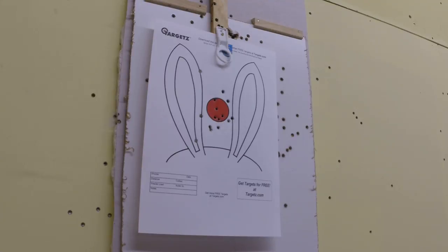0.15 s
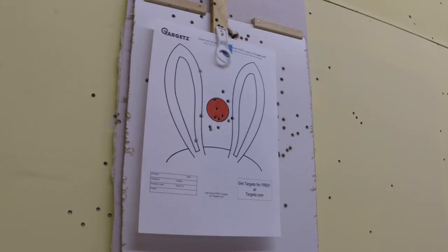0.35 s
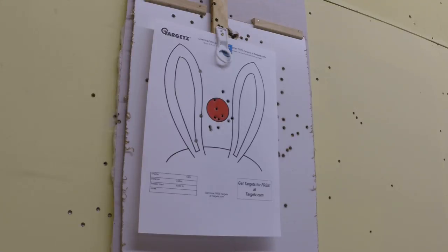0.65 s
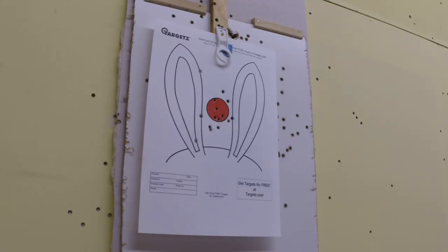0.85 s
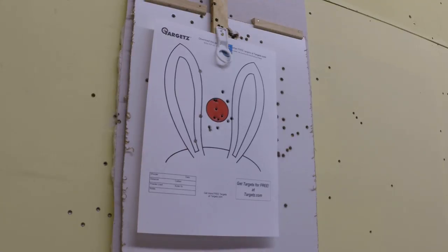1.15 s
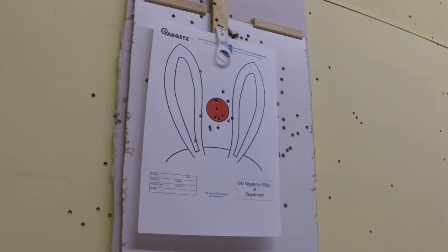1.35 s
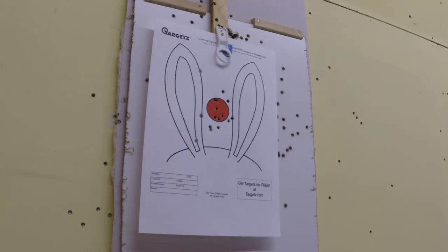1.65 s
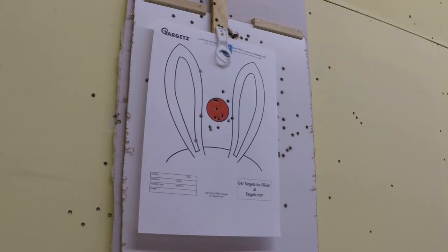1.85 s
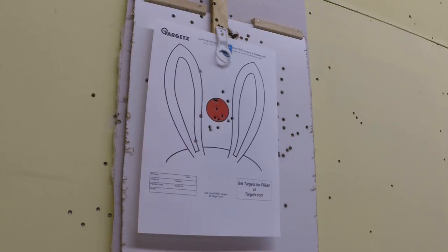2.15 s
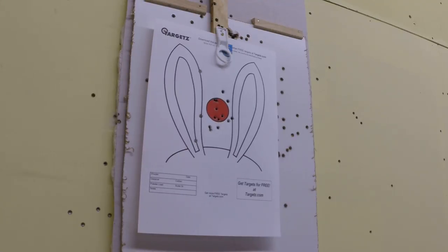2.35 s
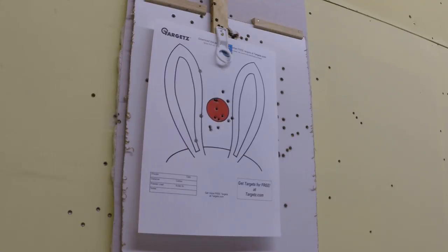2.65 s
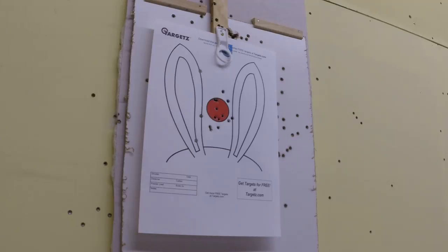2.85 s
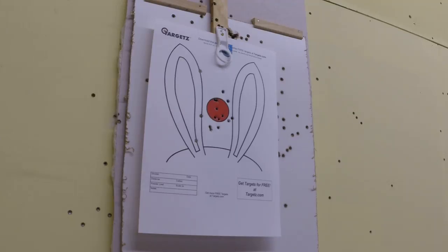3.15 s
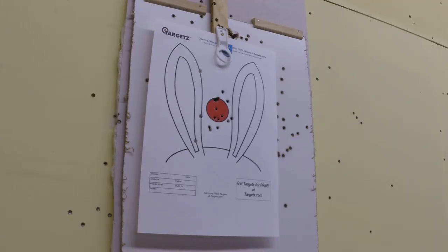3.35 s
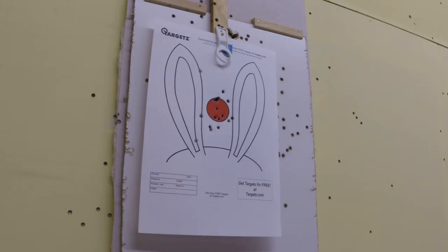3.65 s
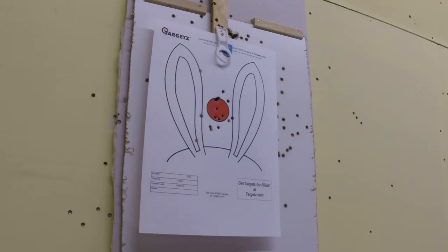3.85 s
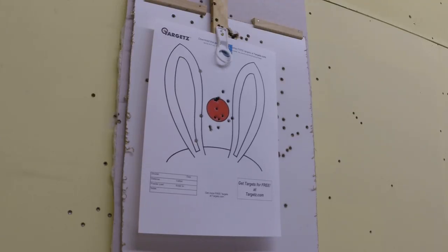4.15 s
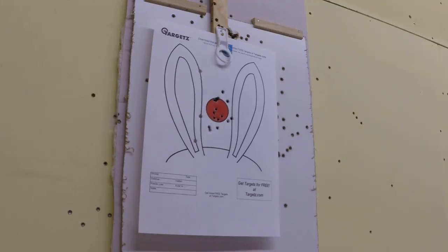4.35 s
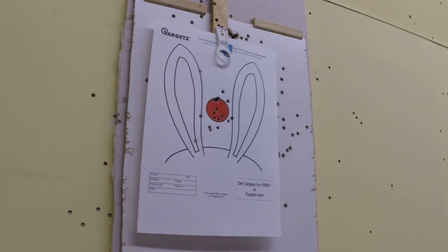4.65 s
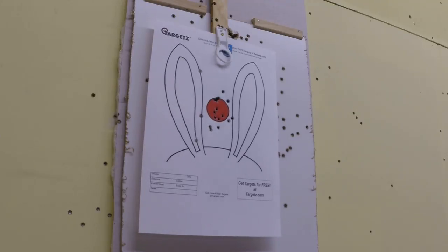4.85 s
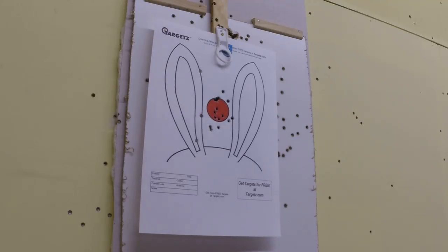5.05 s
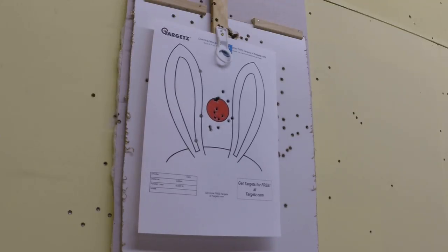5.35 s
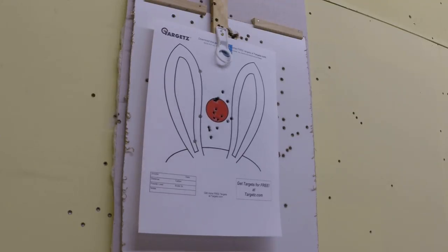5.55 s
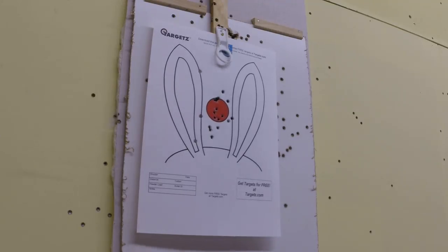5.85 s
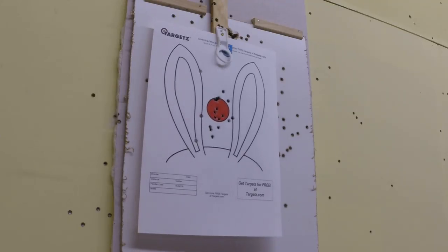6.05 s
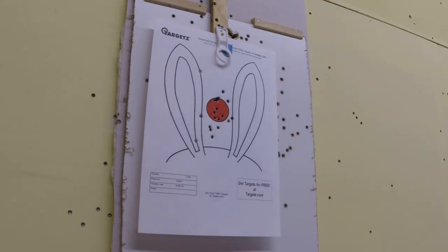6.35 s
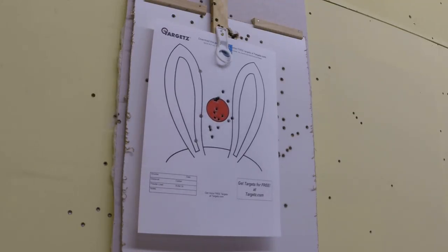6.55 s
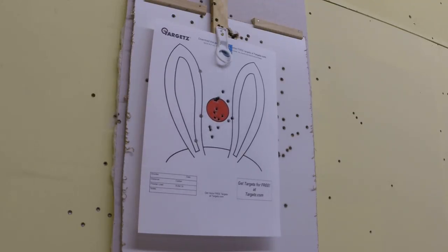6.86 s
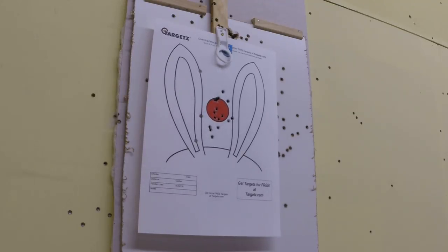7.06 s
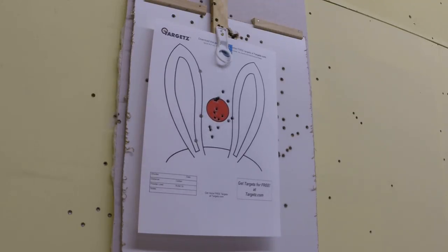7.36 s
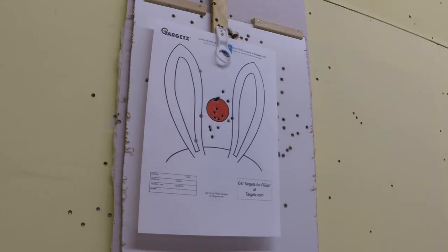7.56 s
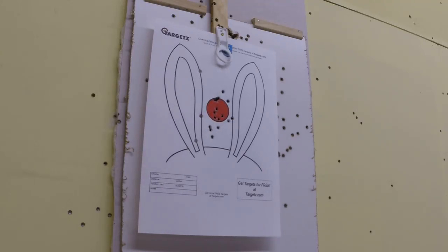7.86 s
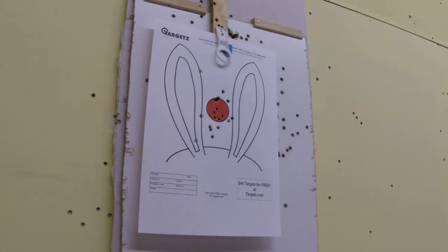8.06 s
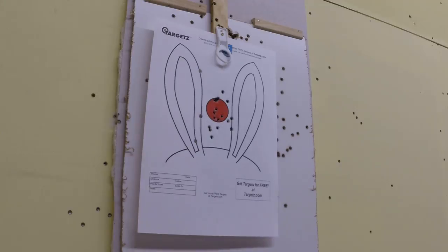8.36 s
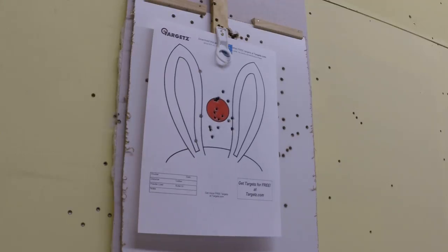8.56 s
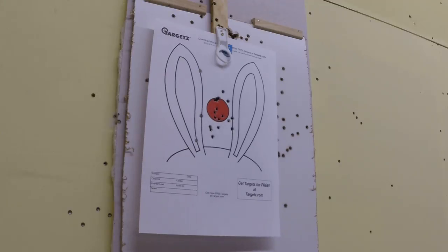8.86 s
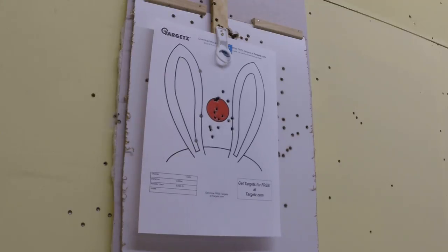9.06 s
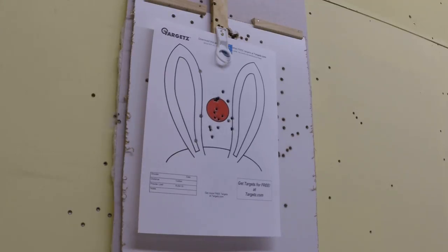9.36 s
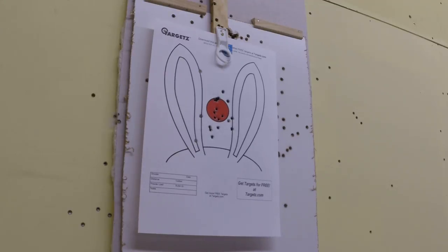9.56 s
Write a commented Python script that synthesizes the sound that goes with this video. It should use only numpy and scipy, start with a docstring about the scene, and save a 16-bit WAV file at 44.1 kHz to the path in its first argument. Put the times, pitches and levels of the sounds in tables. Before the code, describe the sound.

A small pistol fires five single, echoing shots in an indoor shooting hall, with faint gun clicks and humming ventilation between them.

```python
"""An indoor shooting range, beside the paper target: five small-calibre pistol shots over a ventilation hum.
Each blast, a shock wave, outruns its subsonic bullet, which then snaps through the paper. Reflections
from walls and ceiling baffles follow, and the long hall roars with reverberation. Spent cases tinkle and
guns click far away, ringing at their natural frequencies. A gain control ducks the hum after every shot."""
import sys
import numpy as np
from scipy import signal
from scipy.fft import rfft, irfft
from scipy.io import wavfile
from scipy.ndimage import uniform_filter1d

SR = 44100
rng = np.random.default_rng(int(sys.argv[2]) if len(sys.argv) > 2 else 0)


def master(y):
    """Save y as 16-bit WAV."""
    cut = np.clip(np.atleast_2d(y).T, -1, 1)
    pcm = np.round(cut * 32767)  # scale
    wavfile.write(sys.argv[1], SR, pcm.astype(np.int16))


N = 427769


def undb(db):
    return 10 ** (np.asarray(db) / 20)


def level(x, db):
    """Scale to an rms level."""
    return x * undb(db) / np.sqrt(np.mean(x ** 2))


def seconds(size):
    return np.arange(size) / SR


def bins(size):
    return np.arange(size // 2 + 1) * SR / size


def lookup(hz, points):
    """Interpolate (Hz, value) points on a log-frequency axis."""
    point_hz, value = np.transpose(points)
    return np.interp(np.log(np.maximum(hz, 1)), np.log(point_hz), value)


def noise(points, size):
    """Spectral shaping: noise of rms 1 with a (Hz, dB) spectrum."""
    spectrum = rfft(rng.standard_normal(size)) * undb(lookup(bins(size), points))
    return level(irfft(spectrum, size), 0)


def resonance(hz, width_hz, db, size):
    """Forced vibration: one resonance driven by noise, at an rms level."""
    shape = 1 / (1 + ((bins(size) - hz) * 2 / width_hz) ** 2)
    return level(irfft(rfft(rng.standard_normal(size)) * shape, size), db)


def colour(x, points, size=4096):
    """Minimum-phase filtering: a causal (Hz, dB) response keeps attacks sharp."""
    cepstrum = irfft(np.log(undb(lookup(bins(size), points))))
    cepstrum[1:size // 2] *= 2
    cepstrum[size // 2 + 1:] = 0
    impulse_response = irfft(np.exp(rfft(cepstrum)))
    return signal.fftconvolve(x, impulse_response)[:len(x)]


def fade(t, t60):
    """Exponential decay: 60 dB down after t60 seconds."""
    return np.exp(-np.log(1000) * t / t60)


def add(out, start_s, x):
    """Mix x into out from start_s on."""
    i = int(round(start_s * SR))
    out[i:i + len(x)] += x[:max(len(out) - i, 0)]


# Air in the ducts. Each row: frequency in Hz, relative spectral density in dB.
AIR_SPECTRUM = [(12, -41.5), (20, -7.5), (82, -5.5), (124, -2), (194, -16), (270, -19), (302, -25),
                (445, -32.5), (497, -30.5), (540, -30), (818, -35), (1270, -42), (12000, -63.5),
                (13400, -63.5), (15000, -68.5)]
# Fan hum, duct resonances and a thin hiss. Each row: frequency in Hz, width in Hz, level in dB.
HUM_BANDS = [(118, 26, -44), (268, 13, -51), (812, 40, -65), (13200, 500, -84)]

def ventilation(air_db=-33.5, surge_db=1, bass_hz=200):
    """Flow noise and duct resonance: a rumble whose bass surges a little, under a wavering fan hum."""
    surge = noise([(2, 0), (8, -40), (30, -120)], N)
    air = noise(AIR_SPECTRUM, N) * undb(air_db)
    bass = signal.sosfilt(signal.butter(2, bass_hz, fs=SR, output="sos"), air)
    hum = sum(resonance(hz, width_hz, db, N) for hz, width_hz, db in HUM_BANDS)
    return air + bass * (undb(surge_db * surge) - 1) + hum


# The blast as it leaves the firing booth. Each row: frequency in Hz, relative level in dB.
BLAST_SPECTRUM = [(50, -14), (160, -11), (280, 1.5), (400, -9.5), (600, 2.5), (790, -10.5), (1300, -18),
                  (1800, -18.5), (2250, -9.5), (2850, -18.5), (3700, -10), (5000, -17), (10500, -23),
                  (15000, -45.5)]
# Booth resonances that give the crack its edge. Each row: frequency in Hz, width in Hz, boost in dB.
BOOTH_RESONANCES = [(1330, 61, 7.5), (2240, 200, 2.5), (3400, 340, 3.5), (5610, 160, 6.5), (6860, 90, 4.5)]

def blast(t, length_s=0.0061, size=1024):
    """Shock wave: with its first bounces in the booth, a few ms of dense pressure jumps of rms about 1."""
    gate = seconds(size) < length_s
    jumps = rng.standard_normal(size) * gate
    for _ in range(20):  # a shock holds all frequencies evenly
        phase = np.angle(rfft(jumps))
        jumps = irfft(np.exp(1j * phase)) * gate
    wave = colour(np.pad(jumps, (0, len(t) - size)), BLAST_SPECTRUM)
    for hz, width_hz, db in BOOTH_RESONANCES:
        ringing = signal.lfilter(*signal.iirpeak(hz, hz / width_hz, fs=SR), wave)
        wave = wave + (undb(db) - 1) * ringing
    return wave * np.sqrt(length_s * SR / np.sum(wave ** 2))


# Distinct wall echoes of the blast. Each row: delay in seconds, gain in dB.
WALL_ECHOES = [(0.019, -11), (0.0243, -8.5), (.036, -14.5)]

def near_walls(t, wave, scatter_db=-10, scatter_t60=0.23, slap_band_hz=(750, 4400)):
    """Early reflection: frames and walls scatter the blast; small panels return thin, dull slaps."""
    scatter = rng.standard_normal(len(t)) * fade(t, scatter_t60)
    scatter *= undb(scatter_db) / np.sqrt(np.sum(scatter ** 2))
    out = signal.fftconvolve(wave, scatter)[:len(t)]
    slap = signal.sosfilt(signal.butter(3, slap_band_hz, "bandpass", fs=SR, output="sos"), wave)
    for delay_s, db in WALL_ECHOES:
        add(out, delay_s, slap * undb(db))
    return out


# The roar of the hall. Each row: frequency in Hz, relative spectral density in dB.
ROAR_SPECTRUM = [(40, -15), (110, -15.5), (170, -9), (290, -2.5), (390, -0.5), (620, -3.5), (820, -3),
                 (1300, -13), (1500, -20.5), (3400, -19), (4700, -32), (6500, -40.5), (8300, -43),
                 (11000, -56), (15000, -71.5)]
# Its reverberation time. Each row: frequency in Hz, time to fall 60 dB in seconds.
REVERB_TIMES = [(100, 1), (240, 0.94), (560, 0.82), (900, 0.62), (1400, 0.62), (3400, 0.62), (5000, 0.51),
                (9000, 0.48), (13000, 0.31)]

def hall(t, roar_db=-21, round_trip_s=0.23, build_db=12, onset_s=0.0081, return_db=2, return_width_s=0.047):
    """Reverberation: reflections pile up and swell back from the far end; each band dies at its own rate."""
    spectrum, roar = rfft(noise(ROAR_SPECTRUM, len(t))), 0
    centres = np.transpose(REVERB_TIMES)[0]
    for share, (_, t60) in zip(np.eye(len(centres)), REVERB_TIMES):
        band_shape = lookup(bins(len(t)), np.column_stack([centres, share]))
        band = irfft(spectrum * band_shape, len(t))
        roar = roar + band * fade(t - round_trip_s, t60)
    onset = 1 - np.exp(-t / onset_s)
    build_up = undb(build_db * np.minimum(t / round_trip_s - 1, 0))
    far_end = undb(return_db * np.exp(-((t - 1.22 * round_trip_s) / return_width_s) ** 2))
    return roar * onset * build_up * far_end * undb(roar_db)


# Standing waves across the hall. Each row: frequency in Hz, relative level in dB.
ROOM_MODES = [(150, -34.5), (243, -23.5), (380, -32), (580, -29.5), (748, -29.5), (813, -31.5),
              (1005, -27.5)]

def standing_waves(t, build_s=0.17):
    """Normal modes: a few room resonances swell under the roar and die with it."""
    rings = 0
    for hz, db in ROOM_MODES:
        tone = np.sin(2 * np.pi * (hz * t + rng.random()))
        rings = rings + undb(db) * tone * fade(t - build_s, lookup(hz, REVERB_TIMES))
    return rings * (1 - np.exp(-(t / build_s) ** 2))


def flutter(t, delay_s=0.019, start_hz=290.6, limit_hz=1085, climb_s=0.048,
            gain_db=-14.5, attack_s=0.004, hold_s=0.043, t60=0.29, unevenness=0.5):
    """Repetition pitch: echoes from a row of ceiling baffles crowd together into a rough, rising tone."""
    age = np.maximum(t - delay_s, 0)
    hz = limit_hz + (start_hz - limit_hz) * np.exp(-age / climb_s)
    tone = np.sin(2 * np.pi * np.cumsum(hz) / SR)
    envelope = np.minimum(age / attack_s, 1) * fade(np.maximum(age - hold_s, 0), t60)
    roughness = 1 + unevenness * noise([(100, 0), (400, -40), (2000, -100)], len(t))
    return undb(gain_db) * tone * envelope * roughness


# The shots. Each row: start in seconds, gain in dB, lag of the bullet behind its blast in seconds.
PISTOL_SHOTS = [(1.0541, 16.5, 0.014), (3.2758, 15.5, .0149), (4.4373, 16.5, 0.012), (5.6377, 16, .0171),
                (8.2289, 18, 0.014)]

def pistol():
    """Time invariance: gun and listener stay put, so every shot wakes the same echoes."""
    t, out = seconds(size=65536), np.zeros(N)
    wave = blast(t)
    report = wave + near_walls(t, wave) + hall(t) + standing_waves(t) + flutter(t)
    for start_s, db, _ in PISTOL_SHOTS:
        add(out, start_s, undb(db) * report)
    return out


# Tearing paper. Each row: frequency in Hz, relative level in dB.
SNAP_SPECTRUM = [(2000, -19.5), (5000, -14.5), (7200, 0.5), (10500, -6), (15000, -17)]

def bullets(snap_db=6.5, size=48):
    """Subsonic flight: each bullet arrives behind its blast and tears the paper in about a millisecond."""
    out = np.zeros(N)
    for start_s, _, lag_s in PISTOL_SHOTS:
        snap = noise(SNAP_SPECTRUM, size=2048)[:size] * np.linspace(1, 0, size)
        add(out, start_s + lag_s, level(snap, snap_db))
    return out


# Spent cases landing and bouncing. Each row: start in seconds, tick level in dB, ring level in dB.
CASE_LANDINGS = [(1.611, -47, -61), (1.685, -52, -48), (3.877, -45.5, -63), (4.989, -47, -66),
                 (5.231, -49.5, -60), (7.183, -60, -69), (8.665, -54, -63)]
# Brass striking the floor. Each row: frequency in Hz, relative level in dB.
TICK_SPECTRUM = [(1000, -6.5), (2500, 0), (4000, -2), (6000, -16), (10000, -41), (15000, -34)]

def cases(ring_hz=11900, spread_hz=70, tick_t60=0.37, ring_t60=0.16):
    """Free vibration: little brass tubes, all alike, tick on the floor and ring near one very high note."""
    t, out = seconds(size=16384), np.zeros(N)
    for start_s, tick_db, ring_db in CASE_LANDINGS:
        hz = ring_hz + spread_hz * rng.standard_normal()
        tick = undb(tick_db) * noise(TICK_SPECTRUM, len(t)) * fade(t, tick_t60)
        ring = undb(ring_db) * np.sin(2 * np.pi * hz * t) * fade(t, ring_t60)
        add(out, start_s, tick + ring)
    return out


# Gun handling. Each row: start in seconds, level in dB, ring frequency in Hz, click t60 in seconds.
GUN_CLICKS = [(4.159, -50, 2610, 0.42), (5.561, -55, 3320, 0.57), (6.419, -38.5, 2510, 0.23),
              (6.441, -43.5, 1920, .2), (6.962, -51, 3300, 0.53), (7.187, -54, 2700, 0.47),
              (7.312, -58.5, 3040, 0.5), (8.860, -57.5, 4000, .3), (8.969, -47.5, 3430, 0.22),
              (9.093, -57.5, 4490, .11), (9.415, -54.5, 3850, .14)]
# The wooden bench. Each row: frequency in Hz, relative level in dB.
KNOCK_SPECTRUM = [(200, -10.5), (650, 3.5), (1100, -11.5), (2500, -30.5), (8000, -61)]

def handling(ring_db=-10, ring_t60=0.55, ring_width_hz=500, knock_t60=0.4, rise_s=0.0025,
             soft_click_db=-48.5, brightening=0.55):
    """Impact excitation: distant metal clicks and rings, smeared by the hall, and the bench knocks."""
    t, out = seconds(size=32768), np.zeros(N)
    onset = 1 - np.exp(-t / rise_s)
    for start_s, db, hz, t60 in GUN_CLICKS:
        treble_db_per_octave = -12.5 + brightening * (db - soft_click_db)  # harder is brighter
        treble_db = treble_db_per_octave * np.log2(11500 / hz)
        spectrum = [(hz / 4, -16), (hz / 2, -11), (hz, 0), (11500, treble_db), (15500, -45)]
        click = noise(spectrum, len(t)) * fade(t, t60)
        ring = resonance(hz, ring_width_hz, ring_db, len(t)) * fade(t, ring_t60)
        knock_db = -5.5 - 17 * np.log2(hz / 2400)  # heavy, low-ringing parts knock hardest
        knock = undb(knock_db) * noise(KNOCK_SPECTRUM, len(t)) * fade(t, knock_t60)
        add(out, start_s, undb(db) * (click + ring + knock) * onset)
    return out


def scene():
    """Superposition: the pressures of all sources add in one channel."""
    return (pistol() + bullets() + cases() + handling() + ventilation())[None]


def gain_control(x, ceiling_db=-5.5, recovery_db_per_s=19.5, window_samples=265, ahead_samples=400):
    """Limiting: gain drops just ahead of a loud sound to hold it at the ceiling, then recovers steadily."""
    power = np.maximum(uniform_filter1d(x ** 2, window_samples), 1e-12)
    over_db = np.maximum(10 * np.log10(power) - ceiling_db, 0)
    over_db = np.pad(over_db[ahead_samples:], (0, ahead_samples))
    climb_db = recovery_db_per_s * seconds(len(x))
    cut_db = np.maximum.accumulate(over_db + climb_db) - climb_db
    return x * undb(-cut_db)


def record(dry, top_hz=15000):
    """Saturation and band limiting: peaks that pass the gain control clip, and the top treble is cut."""
    clipped = np.clip(gain_control(dry[0]), -1, 1)
    top_cut = signal.ellip(8, 0.2, 70, top_hz, fs=SR, output="sos")
    return signal.sosfilt(top_cut, clipped)[None]


dry = scene()
out = record(dry)
master(out)
```